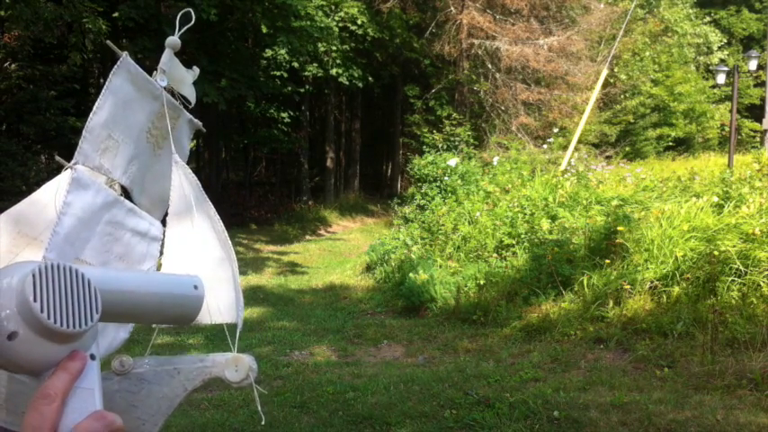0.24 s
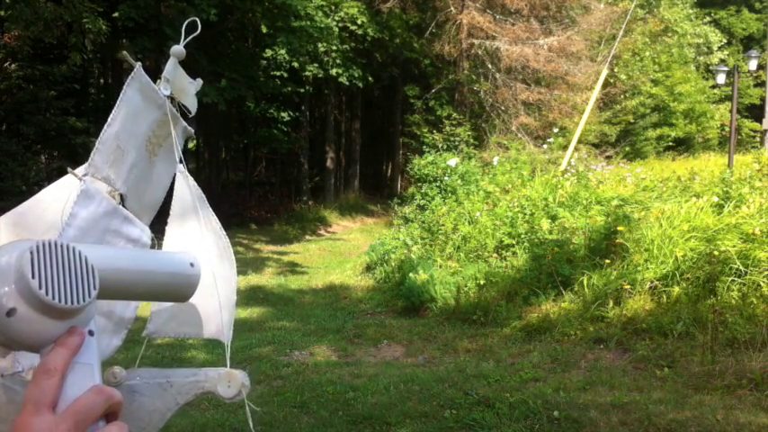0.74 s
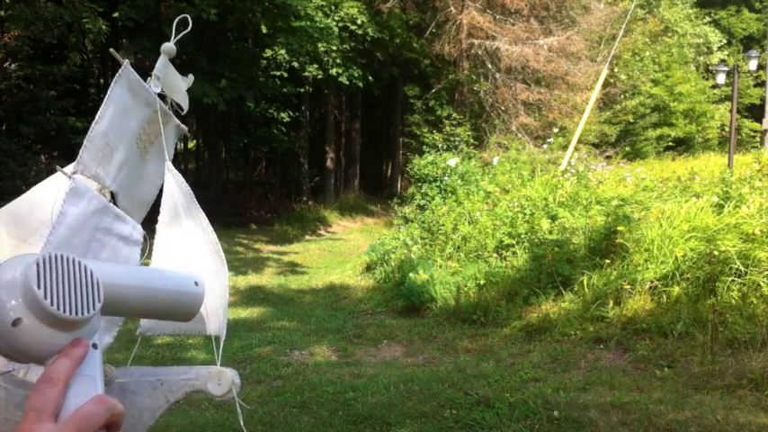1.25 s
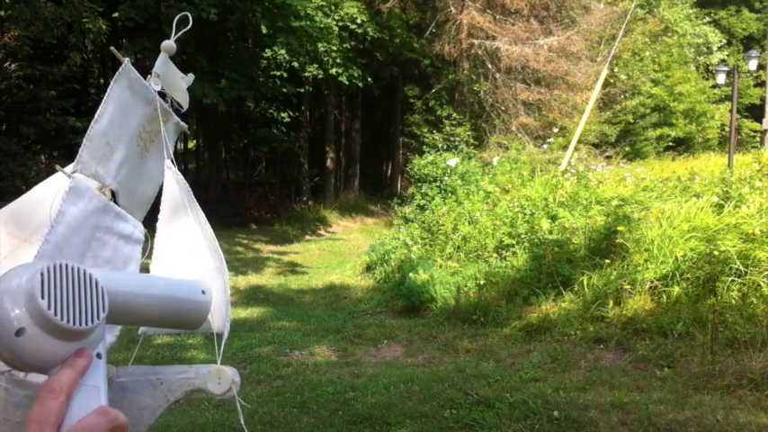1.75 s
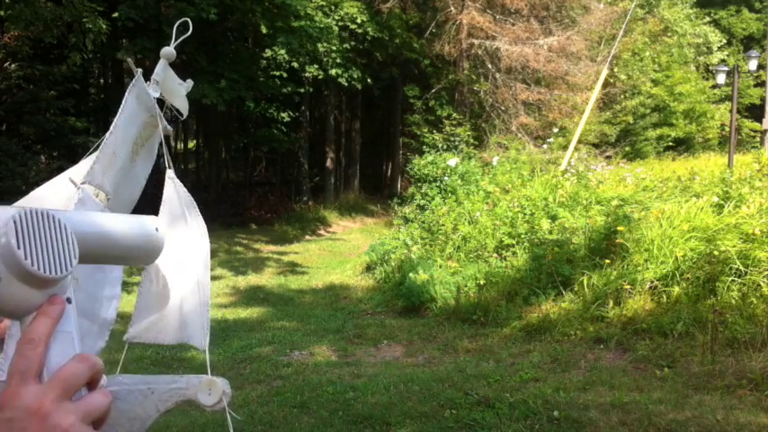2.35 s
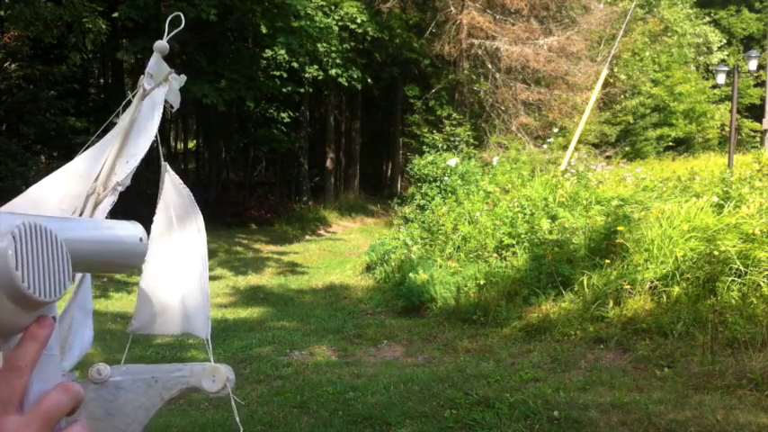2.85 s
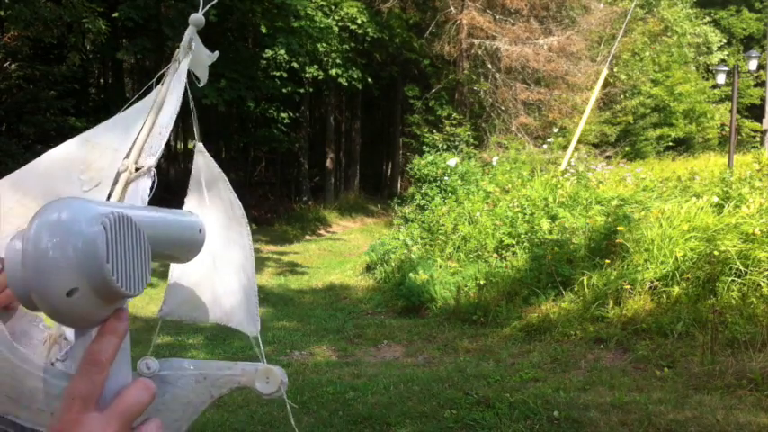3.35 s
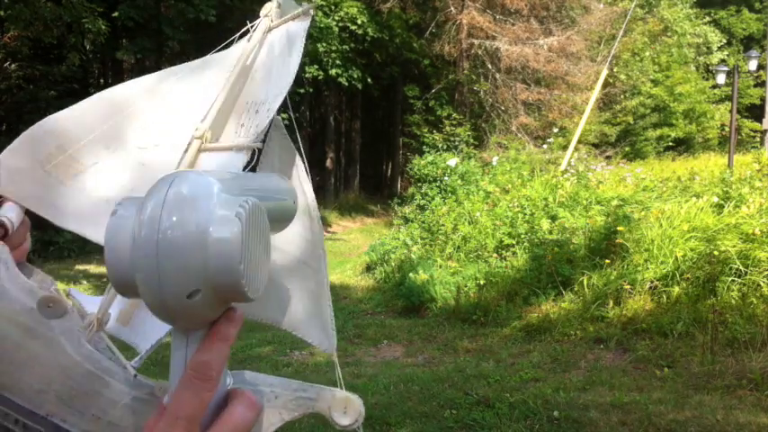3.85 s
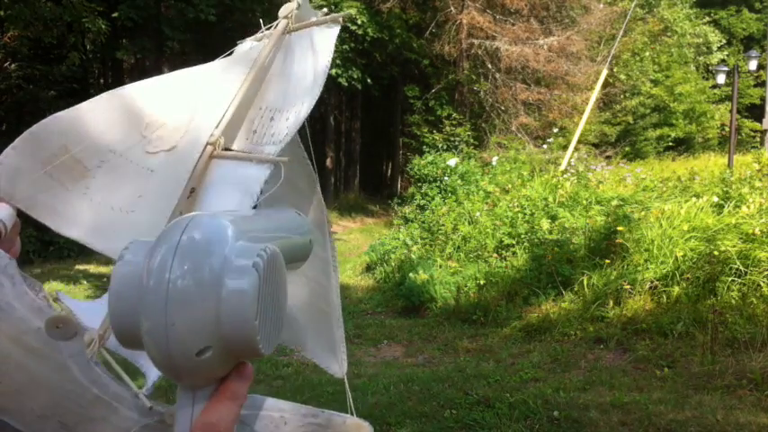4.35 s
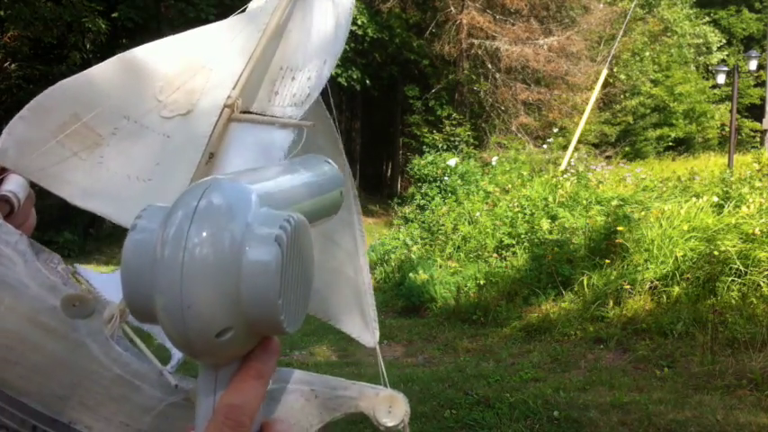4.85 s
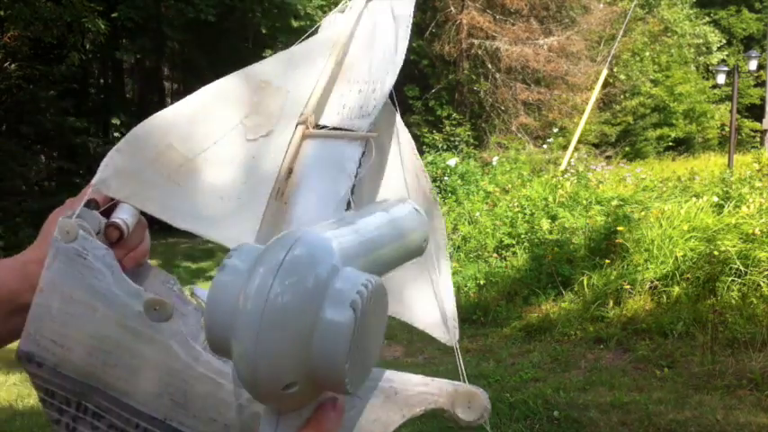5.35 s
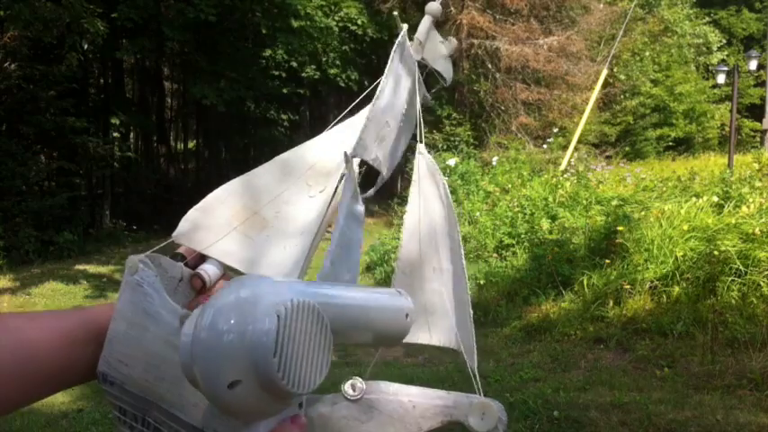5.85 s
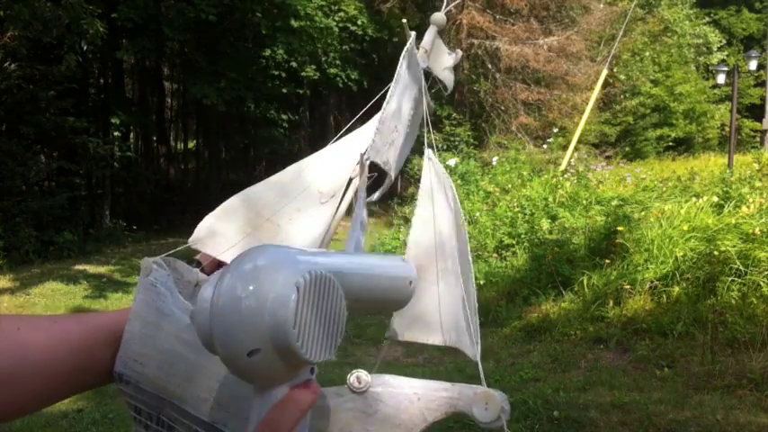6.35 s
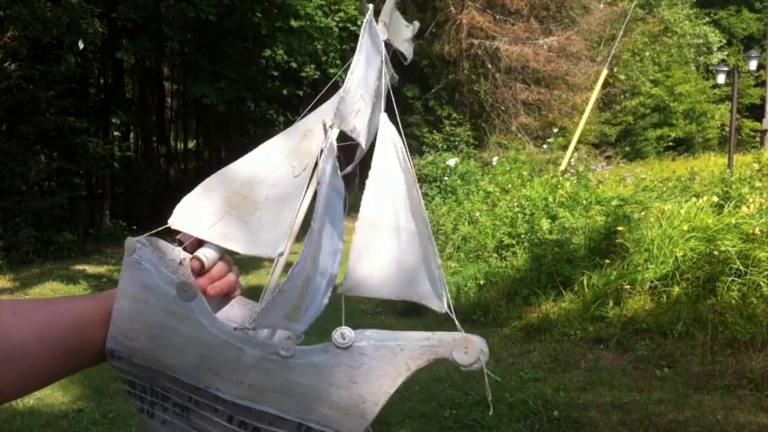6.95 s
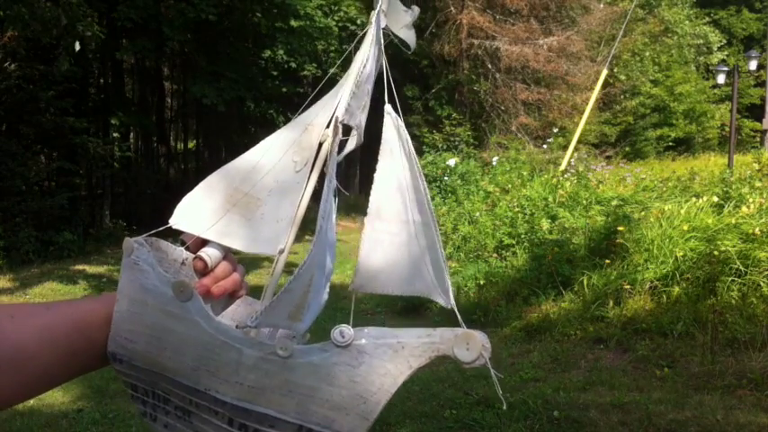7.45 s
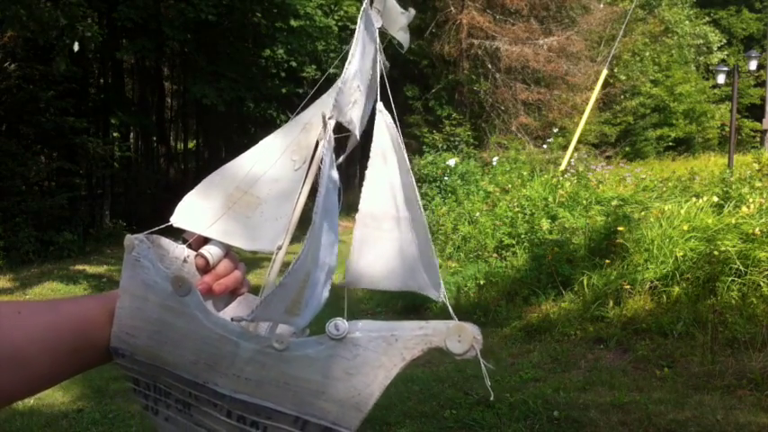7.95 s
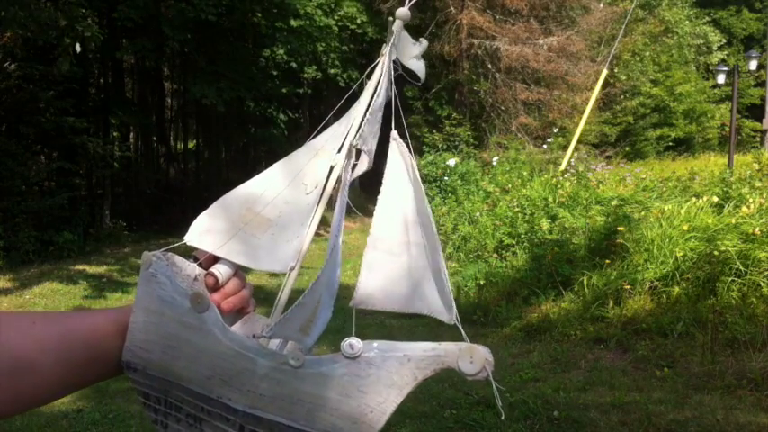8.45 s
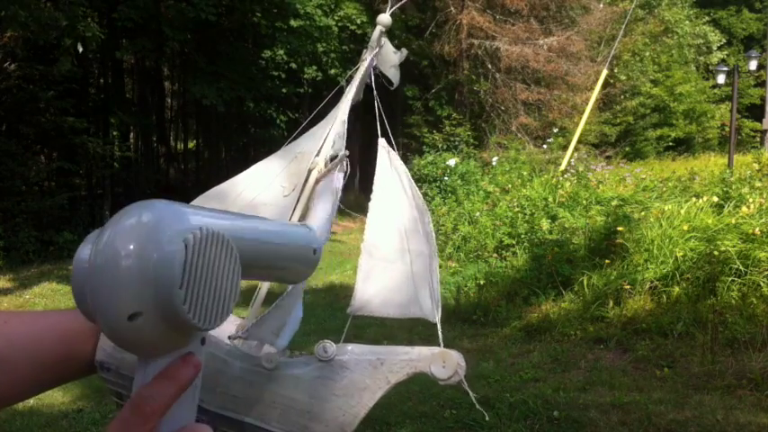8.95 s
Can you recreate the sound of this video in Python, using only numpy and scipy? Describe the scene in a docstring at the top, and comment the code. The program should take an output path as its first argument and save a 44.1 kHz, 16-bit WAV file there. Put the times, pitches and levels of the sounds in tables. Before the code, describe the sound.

Outdoors, a close hair dryer blows on a paper boat's sails, its hollow rush and high whine changing colour slightly as it moves. Short breathy whistles come off the paper edges. Late on, the dryer shuts off, sinking in pitch and level with faint squeaky chirps over still garden air. Less than a second later a switch clicks and it rises back to full speed.

```python
"""A hair dryer roars and whines close by, blowing on the sails of a paper boat in a quiet garden.
Air rushes through its twelve-blade fan, rings the hollow housing and hisses out of the nozzle.
The sound shifts as the hand turns the dryer and the paper reflects it. Near the end the power is cut:
the fan coasts down with a faint squeak, then the switch clicks and it spins up again."""
import sys
import numpy as np
from scipy import signal
from scipy.fft import rfft, irfft, next_fast_len
from scipy.io import wavfile
from scipy.ndimage import uniform_filter1d, map_coordinates

SR = 44100
rng = np.random.default_rng(int(sys.argv[2]) if len(sys.argv) > 2 else 0)


def wrap_up_sound(samples):
    """Save the sound to the file named by the first command line argument, as 16-bit audio."""
    columns = np.atleast_2d(samples).T
    # keep every value between -1 and 1, then stretch to whole-number steps
    tamed = np.clip(columns, -1, 1)
    steps = np.round(tamed * 32767).astype(np.int16)
    wavfile.write(sys.argv[1], SR, steps)


N = 405279
TIME = np.arange(N) / SR
POWER_OFF_S, POWER_ON_S = 7.568, 8.39
LOWERED_S, RAISED_S = 7.06, 8.54  # the dryer is behind the boat between these times


def amp(db):
    """Turn decibels into a gain to multiply by."""
    return np.exp(np.asarray(db) * (np.log(10) / 20))


def unit(x):
    """Scale x to an average (rms) level of 1."""
    return x / np.sqrt(np.mean(x ** 2) + 1e-20)


def curves(rows):
    """Join timed rows with straight lines: one curve for each column after the time."""
    times, *columns = np.transpose(rows)
    return [np.interp(TIME, times, column) for column in columns]


def wobble(per_second):
    """A smooth curve through per_second random values each second."""
    times = np.linspace(0, TIME[-1], num=N // 40)
    values = rng.standard_normal(int(N * per_second / SR) + 4)
    return np.interp(TIME, times, map_coordinates(values, [times * per_second]))


def swell(peak_s, length_s):
    """A smooth rise and fall around peak_s."""
    return np.exp(-2 * ((TIME - peak_s) / length_s) ** 2)


def filtered(x, gain_at):
    """Turn each frequency of x up or down by gain_at(hz)."""
    size = next_fast_len(N + SR // 2)
    return irfft(rfft(x, size) * gain_at(np.fft.rfftfreq(size, 1 / SR)), size)[..., :N]


def noise(spectrum):
    """Noise of level 1, shaped by rows of pitch_hz, relative_db."""
    pitch_hz, relative_db = np.transpose(spectrum)
    gain_at = lambda hz: amp(np.interp(np.log(hz + 1), np.log(pitch_hz + 1), relative_db))
    return unit(filtered(rng.standard_normal(N), gain_at))


def ringing(peaks, steepness):
    """Noise of level 1 that rings at rows of pitch_hz, width_hz, relative_db."""
    def gain_at(hz):
        power = 0
        for pitch_hz, width_hz, db in peaks:
            off_pitch = (hz ** 2 - pitch_hz ** 2) / (width_hz * hz + 1)
            power += amp(db) ** 2 / (1 + off_pitch ** 2) ** steepness
        return np.sqrt(power)
    return unit(filtered(rng.standard_normal(N), gain_at))


# the low hush of outdoor air: pitch_hz, relative_db
GARDEN_SPECTRUM = [(40, 5), (100, 12), (220, 2), (450, 0), (900, -1), (2000, -22), (8000, -9), (16000, -22)]

def garden():
    """Faint, even outdoor air, heard only when the dryer dies down."""
    return amp(-43) * noise(GARDEN_SPECTRUM)


def shaft_squeak(first_s=8.043, gap_s=.0393, pitch_hz=5430, width_hz=380):
    """The coasting shaft rubs in nine short, evenly spaced chirps."""
    chirps = sum(swell(first_s + k * gap_s, length_s=.02) for k in range(9))
    return amp(-51) * chirps * ringing([(pitch_hz, width_hz, 0)], steepness=2)


# the taps of the switch contacts: start_s, level_db
SWITCH_TAPS = [(8.388, -40), (8.392, -31)]

def switch_click(fade_s=.025):
    """The contacts snap shut in a small, bright click; each tap loses 60 dB in fade_s."""
    taps = sum((TIME >= s) * amp(db - 60 * np.abs(TIME - s) / fade_s) for s, db in SWITCH_TAPS)
    return taps * noise([(200, -10), (1500, 0), (6000, -1), (15000, 3)])


# moments when the jet catches the edge of a sail: peak_s, length_s, level_db
SAIL_GUSTS = [(2.36, .15, -39), (5.35, 0.2, -22), (6.91, 0.26, -21)]
# the breathy notes of that edge: pitch_hz, width_hz, relative_db
WHISTLE_PEAKS = [(2250, 170, -3), (3140, 300, 2), (4300, 160, 3), (4700, 240, 3.5)]

def sail_whistle():
    """Air whistles briefly over a paper edge."""
    gusts = sum(amp(db) * swell(peak_s, length_s) for peak_s, length_s, db in SAIL_GUSTS)
    return gusts * ringing(WHISTLE_PEAKS, steepness=.75)


def sail_reflection(air, drift_start_s=2.7, drift_m_per_s=.035):
    """Sound bounces off the sails and arrives later and later as the boat moves off."""
    extra_path_m = .127 + drift_m_per_s * np.clip(TIME - drift_start_s, 0, LOWERED_S - drift_start_s)
    delay_s = extra_path_m / 343  # sound travels 343 m a second
    treble = filtered(air, lambda hz: hz / np.hypot(hz, 3000))  # small surfaces reflect only short waves
    return amp(-15.5) * map_coordinates(treble, [np.arange(N) - delay_s * SR], order=3)


def behind_boat(move_s=.35):
    """Slides from 0 to 1 as the dryer is lowered behind the boat, and back as it is raised."""
    ramp = lambda s: np.clip((TIME - s) / move_s + .5, 0, 1)
    return ramp(LOWERED_S) - ramp(RAISED_S)


def shifting_colour(air, wander_db=1.48):
    """The treble slowly dulls, more so behind the boat, and the wandering jet shifts the colour."""
    hz, times, spectrum = signal.stft(air, SR, nperseg=1024)
    db_per_octave = .5 - .26 * TIME - 1.6 * behind_boat()
    treble_octaves = np.log2(np.maximum(hz / 6000, 1))
    treble_db = treble_octaves[:, None] * np.interp(times, TIME, db_per_octave)
    patches = uniform_filter1d(rng.standard_normal(spectrum.shape), size=5, axis=0)  # smooth over pitch
    patches = unit(uniform_filter1d(patches, size=40, axis=1))  # and over time
    return signal.istft(spectrum * amp(treble_db + wander_db * patches), SR, nperseg=1024)[1][:N]


def fan_speed(drag_s=.58, friction_s=4.0, spin_up_s=.155):
    """Share of full speed: air drag and friction brake the fan, then the motor pulls it back up."""
    coasted_s = np.clip(TIME, POWER_OFF_S, POWER_ON_S) - POWER_OFF_S
    slowed = np.exp(-coasted_s / friction_s) / (1 + coasted_s / drag_s)
    return 1 - (1 - slowed) * np.exp(-np.maximum(TIME - POWER_ON_S, 0) / spin_up_s)


# the deeper notes of the air inside the housing: pitch_hz, width_hz, relative_db
HOLLOW_PEAKS = [(1062, 104, -4.5), (1190, 100, -9.5), (1336, 170, -8), (1507, 130, -5)]

def hollow_ring(speed, gain_db):
    """Hollow notes stand out as the fan slows; the highest dies first and returns last."""
    slow_boost_db = 12 * np.minimum((1 - speed) / .15, 1)
    reach_hz = 3000 * speed  # the blades barely stir notes above this
    notes = sum(amp(db) * ringing([(hz, width_hz, 0)], steepness=2.35) / (1 + (hz / reach_hz) ** 6)
                for hz, width_hz, db in HOLLOW_PEAKS)
    return amp(-15 + gain_db + slow_boost_db) * speed ** 2.97 * notes


# the notes across the barrel: pitch_hz, width_hz, relative_db
BARREL_PEAKS = [(2140, 110, -3.5), (2268, 147, 2)]

def barrel_ring(speed, gain_db):
    """Sound bounces from wall to wall in the barrel and rings."""
    return amp(-1 + gain_db + .56 * wobble(20)) * speed ** 6 * ringing(BARREL_PEAKS, steepness=1.73)


# the notes of the intake grille: pitch_hz, width_hz, relative_db
GRILLE_PEAKS = [(927, 91, 5.5), (1096, 91, 5.5), (2740, 110, -3.5), (3250, 200, -4), (4210, 110, 0),
                (5450, 110, -3), (5720, 310, -2.5)]

def grille_ring(speed, turn, gain_db):
    """Incoming air rings at the grille, loudest when it faces the microphone."""
    level_db = -21 - 9 * turn + gain_db + .59 * wobble(16)
    return amp(level_db) * speed ** 4.4 * ringing(GRILLE_PEAKS, steepness=.86)


# the notes of the air pockets in the housing: pitch_hz, width_hz, relative_db
HOUSING_PEAKS = [(1285, 150, -5.5), (1465, 113, -1), (1600, 77, -4.5), (3160, 220, -17.5),
                 (3880, 190, -20.5), (4670, 340, -15)]

def housing_ring(speed, turn, gain_db):
    """Rushing air rings the pockets in the housing, heard most from the side."""
    level_db = -2.1 + 2.64 * turn + gain_db + .6 * wobble(25)
    return amp(level_db) * speed ** 5.3 * ringing(HOUSING_PEAKS, steepness=1.04)


# the fan and motor tones: cycles_per_shaft_turn, grille_on_db, side_on_db
FAN_TONES = [(1, -47, -39), (2, -54, -48), (5, -44, -43), (6, -44, -44), (12, -25.5, -29), (13, -44, -42),
             (24, -28.5, -37.5), (30, -38, -48), (33, -42, -54), (34, -43, -47), (35, -40, -43),
             (40, -49, -37), (54, -45, -53), (60, -38, -54), (65, -55, -45)]

def fan_whine(speed, turn, blade_db, blades=12):
    """Tones follow the shaft; they flutter in the uneven inflow and fade fast as it slows."""
    shaft_hz = (178.1 - .18 * TIME) * speed  # the motor sags slowly as it warms
    flutter = 1 + .0003 * wobble(22) + .0005 * wobble(2)
    shaft_angle = 2 * np.pi * np.cumsum(shaft_hz * flutter) / SR
    sideways = turn ** .52  # the grille sends its tones out in a narrow beam
    tones = np.zeros(N)
    for cycles, grille_on_db, side_on_db in FAN_TONES:
        level_db = grille_on_db + sideways * (side_on_db - grille_on_db) + (cycles == blades) * blade_db
        tones += amp(level_db + 2.1 * wobble(45)) * np.sin(cycles * shaft_angle + .22 * wobble(45))
    return np.sqrt(2) * tones * speed ** 12


# the swirling air in the fan at full speed: pitch_hz, relative_db
RUSH_SPECTRUM = [(60, -10.5), (230, -3), (400, -3), (650, 2.5), (950, 2.5), (1250, 0), (1850, -0.5),
                 (2700, -0.5), (3800, -6), (6000, -14.5), (16000, -24.5)]

def fan_rush(speed, gain_db):
    """The blades churn the air into a roar that gets lower and softer as they slow."""
    swirls = map_coordinates(noise(RUSH_SPECTRUM), [np.cumsum(speed ** .7)], mode="wrap")
    return amp(-21.5 + gain_db + .71 * wobble(11)) * speed ** 3.62 * swirls


# the jet of air at the nozzle: pitch_hz, relative_db
JET_SPECTRUM = [(200, -44), (2000, -7), (3000, -2.5), (5000, 0.5), (7000, 0.5), (9000, -1), (13000, -2),
                (15700, -4.5)]

def nozzle_hiss(speed, gain_db):
    """Fast air leaves the nozzle with a bright hiss."""
    return amp(-19.5 + gain_db + .49 * wobble(14)) * speed ** 3.83 * noise(JET_SPECTRUM)


# how the dryer is held: time_s, turn (0 grille to the microphone, 1 side on), nearness_db
HAND_POSES = [(0, 0, 0), (2.4, 0.011, 0.25), (3.5, 0.18, 0.43), (4.0, 1, 1), (4.45, 1, -0.1), (5.7, 1, 0),
              (6.2, 0.66, 0.85), (6.9, 1, 1.24), (7.5, 0.77, 0.3), (8.9, 1, 3), (9.19, 0.34, 2.5)]
# parts that swell and fade as the hand moves: time_s, housing_db, barrel_db, blade_db
HAND_SWELLS = [(0, -21, -26.5, -1), (1, -18.5, -29, 0.5), (2.6, -19, -28.5, 0), (3.4, -20, -26, -3.5),
               (4.15, -18, -21, 1.5), (4.8, -16, -25, -2), (5.45, -16.5, -38, -4.5),
               (5.85, -19.5, -24, -6.5), (6.25, -26, -25, 4), (6.65, -20.5, -26, -10),
               (6.95, -22, -22.5, -5), (7.3, -15.5, -23.5, 1.5), (8.85, -16.5, -27, 3),
               (9.19, -25, -25, -5)]

def hair_dryer():
    """Air noise and fan whine, both following the fan's speed and the moving hand."""
    turn, nearness_db = curves(HAND_POSES)
    housing_db, barrel_db, blade_db = curves(HAND_SWELLS)
    speed = fan_speed()
    # the hiss drops behind the boat and gives way as the housing rings louder
    hiss_db = -2 * behind_boat() - .22 * (housing_db - housing_db.mean())
    air = fan_rush(speed, hiss_db / 2)
    air += housing_ring(speed, turn, housing_db)
    air += barrel_ring(speed, barrel_db)
    air += grille_ring(speed, turn, hiss_db)
    air += nozzle_hiss(speed, hiss_db)
    air += hollow_ring(speed, housing_db)
    air = shifting_colour(air + sail_reflection(air))
    return amp(nearness_db) * (air + fan_whine(speed, turn, blade_db))


def scene():
    """The dryer and its small sounds over the still garden, the same in both channels."""
    mono = hair_dryer() + sail_whistle() + shaft_squeak() + switch_click() + garden()
    return np.array([mono, mono])


def record(dry, bass_cut_hz=175, top_hz=15750):
    """The microphone cuts the bass steeply, rounds off the tallest peaks and drops the highest treble."""
    x = filtered(dry, lambda hz: amp(-40) + hz ** 4 / np.hypot(hz ** 4, bass_cut_hz ** 4))
    rounded = x / (1 + np.abs(x / .95) ** 10) ** .1
    return filtered(rounded, lambda hz: hz < top_hz)


dry = scene()
out = record(dry)
wrap_up_sound(out)
```